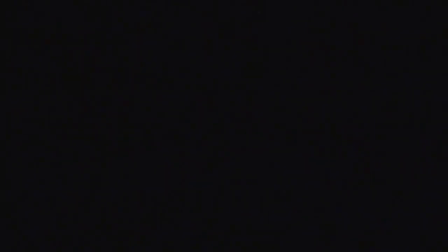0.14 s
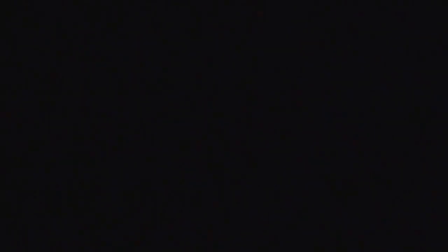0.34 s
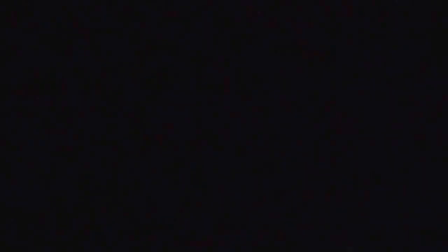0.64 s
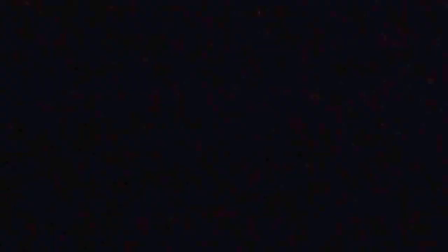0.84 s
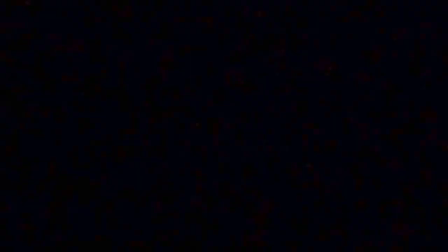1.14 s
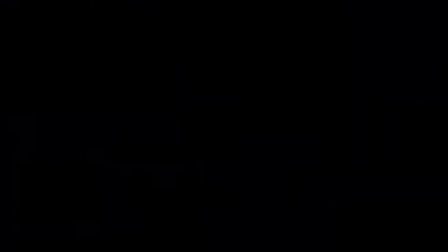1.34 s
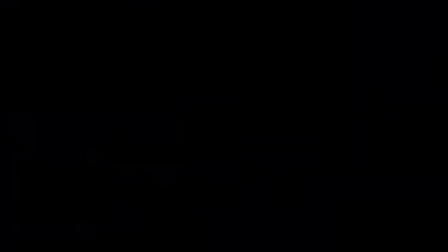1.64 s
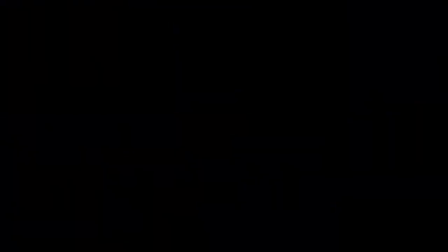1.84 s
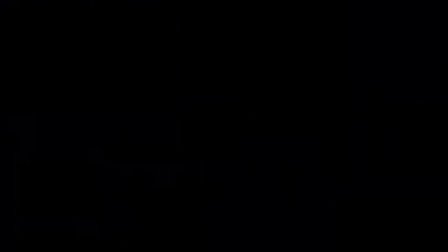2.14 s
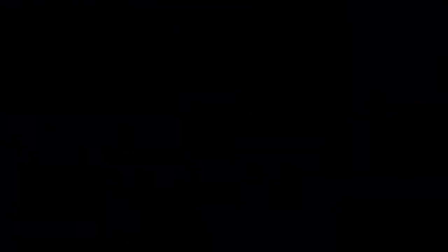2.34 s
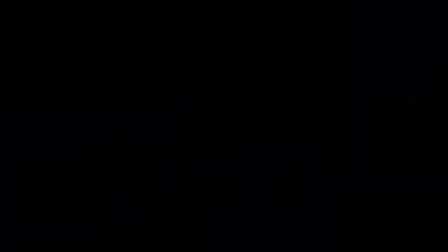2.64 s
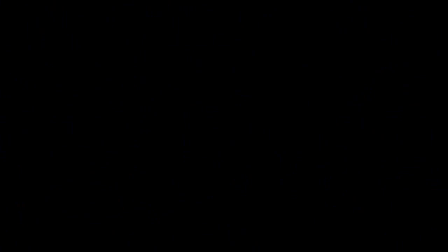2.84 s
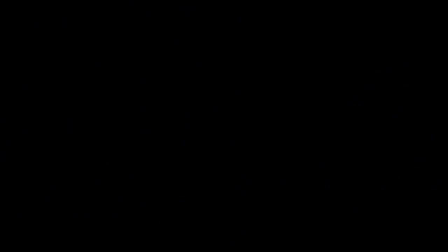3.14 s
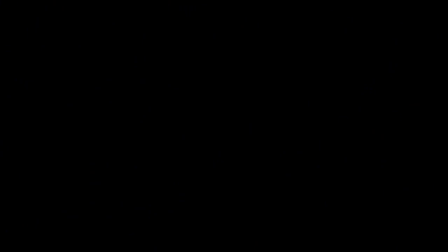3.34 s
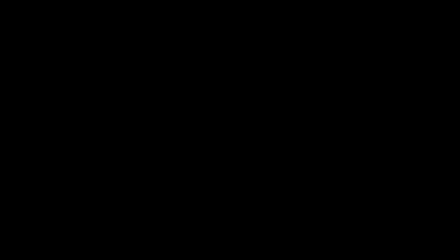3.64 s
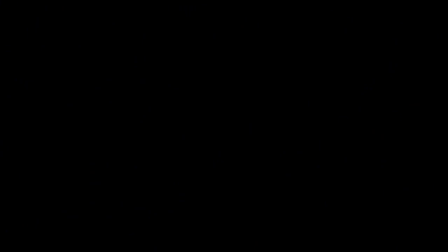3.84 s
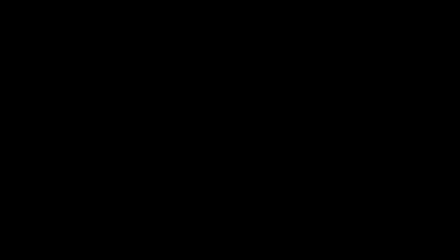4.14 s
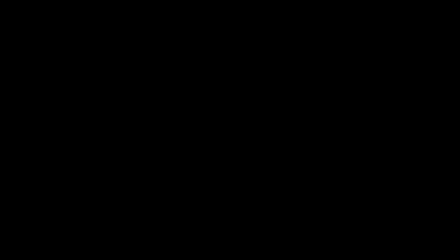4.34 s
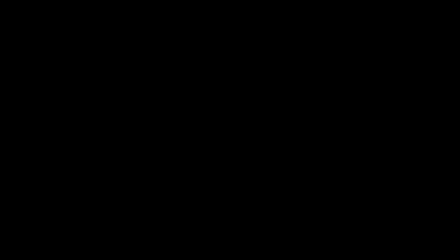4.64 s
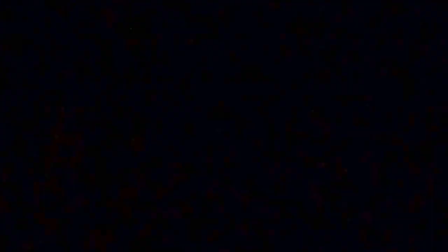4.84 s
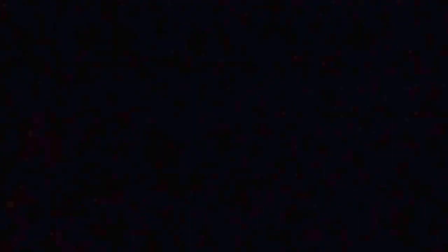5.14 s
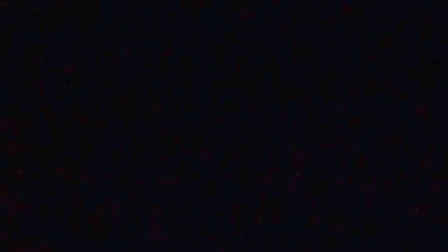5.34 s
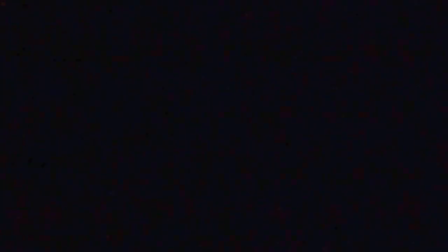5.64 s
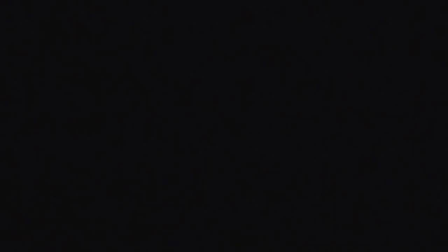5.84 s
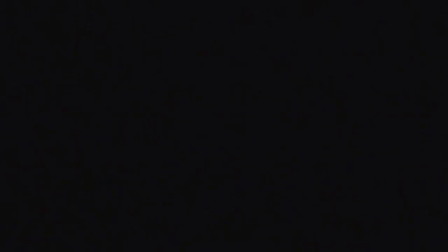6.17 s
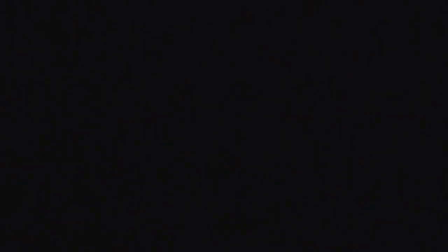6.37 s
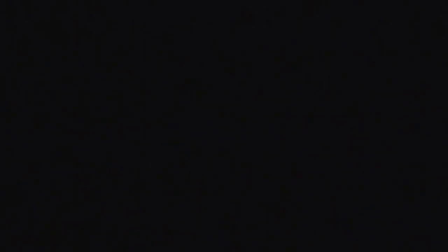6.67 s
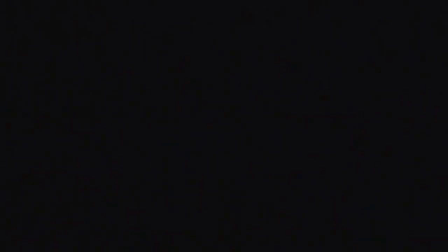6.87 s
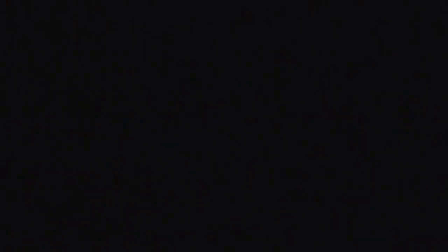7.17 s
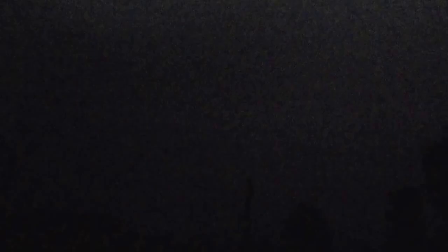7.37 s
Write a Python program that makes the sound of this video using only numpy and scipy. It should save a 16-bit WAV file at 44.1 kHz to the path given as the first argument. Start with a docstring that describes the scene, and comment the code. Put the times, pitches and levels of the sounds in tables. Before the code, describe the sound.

A close microphone in the rain picks up hiss, splashing drops and a faint low hum. Muffled thunder thumps swell first, then a long peal tears open in uneven bursts, low-mid and rough, flattened by overload at its strongest. Brief lulls let the rain through. Later, crisp ticks and splashes crowd in between renewed thunder surges, with dry echoes from near and far surfaces.

```python
"""Close drops tick and splash over the hiss of heavy rain and a broad roar, while thuds and a lumpy rumble roll.
Then thunder breaks into a string of short claps with bright cracks, thrown back by a near and a far surface.
Thunder and rain are shaped noise, drops are short rings with a burst of spray, thuds are brief swings of air.
A low hum drones on beside a second, sinking drone; the loudest moments overload the input of the microphone."""
import sys
import numpy as np
from scipy import signal
from scipy.io import wavfile
from scipy.ndimage import uniform_filter1d

SR = 44100
rng = np.random.default_rng(int(sys.argv[2]) if len(sys.argv) > 2 else 0)


def to_wav(sig):
    """Store sig (one row per channel, or 1-D mono) as 16-bit WAV at the path in sys.argv[1].

    Samples outside -1..1 are clipped; the rate is SR.
    """
    pcm = np.clip(np.atleast_2d(sig), -1, 1) * 32767
    pcm = np.round(pcm).astype(np.int16)
    wavfile.write(sys.argv[1], SR, pcm.T)  # frames by channels


N = 331191
T = np.arange(N) / SR

# Claps: start_s [s], peak_db [dB, body before echoes], pitch_hz [Hz, centre of the noise]
CLAPS = [(1.191, -25, 268), (1.274, -24, 337), (1.311, -24, 260), (1.348, -14.5, 606), (1.384, -23, 570),
         (1.411, -23.5, 265), (1.524, -29, 288), (1.539, -17.5, 570), (1.571, -18, 563), (1.632, -35, 417),
         (1.671, -30, 420), (1.78, -20.5, 504), (1.805, -14.5, 413), (1.869, -28, 444), (1.899, -22, 503),
         (2.036, -18.5, 614), (2.072, -19.5, 367), (2.105, -18, 453), (2.134, -11, 466), (2.177, -18, 298),
         (2.207, -19.5, 410), (2.254, -18, 487), (2.283, -17.5, 313), (2.327, -27.5, 320),
         (2.344, -26, 332), (2.554, -29.5, 290), (2.629, -21, 260), (2.644, -24.5, 388),
         (2.672, -16.5, 396), (2.708, -22.5, 289.5), (2.744, -15.5, 288), (2.847, -31, 262),
         (2.901, -46, 264), (3.014, -28, 302), (3.066, -25, 268), (3.083, -18, 617), (3.102, -16, 498),
         (3.344, -19.5, 558), (3.365, -18, 474), (3.393, -23, 305), (3.503, -13, 722), (3.562, -19, 300),
         (3.604, -18, 310), (3.622, -19, 328), (3.635, -15, 302), (3.655, -24, 406), (3.7, -18, 300),
         (4.238, -23.5, 380), (4.304, -25.5, 450), (4.548, -25, 280), (4.569, -32, 240), (4.7, -18.5, 714),
         (4.738, -16.5, 337), (4.763, -14, 426), (4.791, -20.5, 403), (4.857, -13.5, 475),
         (4.879, -15, 262), (4.911, -16, 430), (4.93, -26, 261), (4.967, -17, 540), (4.977, -19, 256),
         (5.055, -20.5, 524), (5.093, -24, 297), (5.128, -22, 285), (5.188, -17.5, 493),
         (5.336, -18.5, 597), (5.355, -22, 510), (5.408, -21, 233), (5.433, -16.5, 387), (5.449, -19, 224),
         (5.563, -22, 430), (5.606, -28, 402), (5.714, -12.5, 300), (5.739, -24, 202), (5.775, -39, 200),
         (5.881, -23.5, 330), (5.903, -26.5, 344), (5.979, -14.5, 378), (6, -15, 378), (6.032, -24.5, 390),
         (6.124, -23.5, 420), (6.141, -26.5, 386), (6.424, -22.5, 242), (6.65, -20, 605),
         (6.824, -21.5, 404), (6.849, -19.5, 263), (6.866, -12.5, 394), (6.906, -15.5, 438),
         (6.922, -16, 457), (6.948, -22.5, 436), (6.982, -12, 373), (7.02, -22, 400), (7.041, -21.5, 417),
         (7.07, -25, 278), (7.09, -21.5, 345), (7.113, -24, 350), (7.164, -18, 364), (7.217, -17, 350),
         (7.239, -21, 405), (7.253, -21, 400), (7.272, -18, 318), (7.452, -21.5, 310), (7.491, -20, 805)]
# Bright crack on top of the claps: time_s [s], level_db [dB over the clap]
CRACK_LEVEL = [(1.2, -17), (1.45, -15), (1.7, -16), (1.85, -12), (2.14, -18.5), (2.3, -21.5), (2.7, -21),
               (3.1, -23.5), (3.5, -23), (4.3, -21), (4.72, -23.5), (5.1, -26), (5.45, -24.5),
               (5.72, -21.5), (6.0, -26.5), (6.5, -23), (6.9, -26), (7.3, -25)]
# Echo paths as the thunder rolls off: time_s [s], near_lag_s [s], near_gain [0-1], far_gain [0-1], dullness [0-1]
ECHO_PATHS = [(1.2, 0.0033, 0, 0.37, 0), (1.9, 0.0024, 0.26, 0.86, 0), (2.4, 0.0028, 0.29, 0.58, 0.4),
              (2.8, .0039, .65, 0.76, 0.06), (4.2, 0.0039, 0.5, 0.76, 0.18), (5.1, 0.0045, 0.67, 0.7, 0.03),
              (5.9, 0.005, 0.59, 0.64, 0.52), (6.4, 0.0051, 0.57, 0.5, 0.33),
              (7.0, 0.0052, 0.18, 0.08, 0.25), (7.51, 0.0048, 0.06, .03, 0.06)]
# Storm swelling and fading: time_s [s], rumble_db [dB], crackling_roll_db [dB], roar_db [dB]
STORM_LEVEL = [(0, -35.5, -48, -41), (.25, -36, -43.5, -49.5), (.4, -30.5, -38.5, -43.5),
               (.52, -32, -40, -46.5), (.7, -34, -44, -52.5), (.9, -33.5, -57, -50.5),
               (1.35, -32.5, -47, -36), (1.63, -30.5, -43, -38), (1.79, -44, -36, -33),
               (1.855, -44, -36, -37.5), (1.92, -34.5, -30.5, -35), (2.1, -38, -41, -32.5),
               (2.21, -35, -23.5, -38), (2.29, -44, -23, -43.5), (2.34, -27, -38, -49),
               (2.42, -43, -44.5, -51.5), (2.6, -39.5, -47.5, -48), (2.72, -35.5, -29.5, -39.5),
               (2.82, -47, -42, -49), (3.0, -49, -39.5, -46), (3.25, -43, -38.5, -41),
               (3.55, -36, -32, -34.5), (3.73, -45, -44.5, -44.5), (4.22, -45, -35, -38.5),
               (4.68, -40, -36.5, -38.5), (4.78, -48, -32.5, -40.5), (4.84, -35, -43, -42.5),
               (4.9, -50, -35, -47), (4.97, -44, -46, -46), (5.03, -42, -45, -45), (5.17, -40, -32.5, -45),
               (5.3, -41, -38, -38.5), (5.45, -42, -37.5, -44), (5.53, -41, -34.5, -40),
               (6.08, -42, -48.5, -48), (6.5, -45, -33, -42.5), (6.8, -34.5, -39, -43.5),
               (7.0, -37.5, -33, -47.5), (7.3, -38, -37, -49), (7.51, -46, -32, -46.5)]
# Deep thuds: start_s [s], level_db [dB], pitch_hz [Hz]
THUDS = [(0.355, -18, 99), (0.447, -25, 86), (0.579, -17, 60), (0.585, -11, 118), (0.653, -23.5, 110),
         (0.752, -22, 140), (0.79, -17, 120), (0.949, -18.5, 101), (0.998, -18.5, 56), (1.037, -22, 90),
         (1.195, -27, 148), (1.242, -20, 89), (1.273, -16, 134), (1.427, -22, 55), (1.523, -18.5, 54),
         (1.646, -26, 45), (1.719, -17.5, 45), (2.133, -25, 81.5), (2.157, -20, 67), (2.19, -18, 145),
         (2.209, -10, 146), (2.235, -16, 99), (2.264, -13, 120), (2.286, -32, 55), (2.708, -15, 81),
         (2.729, -17, 98), (2.75, -36, 45.6), (5.472, -16, 155), (6.004, -14.5, 145), (6.866, -17.5, 100),
         (6.977, -17, 103), (7.012, -20, 102), (7.215, -16, 98)]
# Tone colour of the rumble: pitch_hz [Hz], density_db [relative dB per Hz]
RUMBLE_COLOUR = [(7.1, -35.5), (12, -16), (29, 3), (125, -1.5), (229, -10), (285, -13.5), (360, -17.5),
                 (402, -11.5), (500, -36.5), (650, -55), (1100, -120)]
# Tone colour of the broad roar that swells with the thunder: pitch_hz [Hz], density_db [relative dB per Hz]
ROAR_COLOUR = [(180, -20.5), (300, 0.5), (344, 1), (374, 5.5), (852, 7), (1060, 5.5), (1150, 4),
               (1580, -1.5), (2890, -16), (8000, -47.5), (10400, -101), (17600, -120)]
# Bright upper band of the roar: time_s [s], level_db [dB]
SIZZLE_LEVEL = [(0, -65), (.6, -58), (1.15, -55), (1.35, -50.5), (1.8, -52.5), (2.15, -79), (2.35, -71),
                (2.6, -88), (3.0, -67.5), (3.4, -54.5), (3.8, -76), (5.9, -72), (6.5, -68), (7.0, -79),
                (7.51, -78)]
# Near drops: start_s [s], level_db [dB], ring_hz [Hz], splash_db [dB over the level]
DROPS = [(0.066, -29.5, 3030, -14), (0.105, -29, 3200, -7.5), (0.322, -42, 3000, -1),
         (0.529, -39, 3180, -3.5), (0.6648, -32, 3000, -25), (1.257, -46, 5500, -16),
         (1.313, -44, 6500, -16), (1.425, -40, 3180, 1), (1.641, -44, 7500, -14), (1.853, -46, 8000, -16),
         (2.011, -44, 5500, -13), (2.037, -40.5, 6040, -5), (2.137, -44, 3260, -13),
         (2.264, -37, 3260, -18), (2.2805, -34.5, 3080, -12), (2.333, -60, 7000, -16),
         (2.564, -54, 3010, -9), (2.616, -47.5, 2900, -10), (2.68, -54, 6000, -13),
         (2.7564, -41, 3010, -17), (2.772, -52, 6500, -16), (2.873, -56, 6500, -14),
         (2.8968, -53, 6500, -8), (3.027, -50, 3000, -2), (3.164, -46, 3210, -2),
         (3.1826, -34.5, 3290, -7.5), (3.227, -39, 3240, -7), (3.5012, -33, 3000, -6.5),
         (3.58, -36, 3030, -1.5), (3.6198, -35, 3040, -7), (3.647, -35.5, 3040, -9),
         (3.712, -34.5, 3200, -7), (3.742, -37, 3350, -9), (3.8186, -43.5, 3020, -2),
         (3.863, -44, 3000, -3), (3.949, -37.5, 3260, -10), (4.0824, -50, 3280, -6),
         (4.1579, -44, 3030, -6), (4.262, -35.5, 3370, -7), (4.337, -41, 3230, -5),
         (4.4293, -46, 3040, -12), (4.4714, -39.5, 3260, -6), (4.561, -37, 3020, -8),
         (4.603, -33, 3040, -10.5), (4.7183, -31.5, 3040, -2), (4.8653, -29.5, 3200, -9),
         (4.907, -42, 3200, -8), (4.946, -38, 3180, -10), (4.993, -38, 3050, -6), (5.031, -42, 3300, -5.5),
         (5.1315, -30, 3450, -6), (5.2014, -31, 3220, -8.5), (5.227, -35.5, 3050, -4),
         (5.266, -27, 3300, -7.5), (5.2934, -35, 4500, -14), (5.32, -39, 3040, -7), (5.367, -45, 7000, -10),
         (5.3936, -25, 4300, -14), (5.5148, -30, 3040, -14), (5.538, -33, 3030, -11),
         (5.563, -33, 3170, -10), (5.5886, -37, 3050, -3), (5.6164, -40, 4200, -9), (5.683, -35, 3200, -6),
         (5.7022, -30, 2850, -2), (5.7395, -35, 3380, -7), (5.8345, -50, 2980, -8),
         (5.8825, -46, 3000, -2.5), (5.928, -44, 3280, -2), (5.9579, -46, 4550, -12),
         (5.9755, -40, 3130, -17), (6.1104, -45, 5000, -6), (6.127, -48, 2980, -10),
         (6.156, -37.5, 3300, -27), (6.22, -39.5, 3060, -9), (6.2432, -43, 3000, -5),
         (6.305, -43, 3130, -1.5), (6.354, -36, 3360, -5), (6.3934, -25.5, 5530, -12.5),
         (6.4363, -38, 3490, -4), (6.485, -43, 3100, -11), (6.58, -38, 3300, -8), (6.6235, -31, 3550, -7),
         (6.651, -32.5, 3380, -6), (6.692, -36, 3240, -8), (6.7111, -25.5, 5770, -16),
         (6.755, -36.5, 3030, -8), (6.867, -36, 2900, -8), (6.894, -33.5, 6300, -31),
         (6.9187, -35, 3230, -19), (6.951, -42, 3000, -7), (7.0246, -38, 3080, -14),
         (7.1696, -50, 2900, -8), (7.242, -32.5, 3040, -16), (7.3575, -38.5, 3320, -7),
         (7.443, -41, 4170, -5)]
# Treble hiss of the far rain: time_s [s], level_db [dB], small_drops_db [dB over the hiss]
HISS_LEVEL = [(0, -57.5, -9), (.27, -58.5, -10), (.6, -54, -18), (1.5, -64.5, -2.5), (3.0, -58.5, -5.5),
              (3.3, -53.5, -8), (4.0, -55.5, -10), (4.6, -51.5, -10), (5.6, -54.5, -6), (6.7, -49, -9.5),
              (7.51, -53, -16)]
# Tone colour of the hiss: pitch_hz [Hz], density_db [relative dB per Hz]
HISS_COLOUR = [(880, -2), (1500, -6.5), (2180, -49), (2900, -15), (3850, -15), (9790, -25), (11000, -28.5),
               (14300, -77.5), (22000, -120)]
# Rain drumming on one surface, a narrow band: time_s [s], level_db [dB]
DRUMMING_LEVEL = [(0, -53.5), (.6, -51), (1.1, -47), (1.5, -41), (2.1, -42.5), (2.35, -59), (3.3, -61.5),
                  (4.3, -50.5), (5.5, -81), (7.51, -94)]
# Second drone, sinking and fading: time_s [s], pitch_hz [Hz], level_db [dB]
DRONE = [(1.4, 61.6, -67), (1.8, 58, -33), (2.3, 59.7, -45), (2.6, 55.9, -69), (3.0, 52.75, -37.5),
         (3.7, 51.9, -45), (4.4, 54.3, -64), (4.8, 53.6, -62)]
# Moments when hiss and hum sink and climb back: deepest_s [s], depth_db [dB, for the hiss]
DIPS = [(1.85, 6.5), (2.17, 4.5), (2.361, 25.5), (3.66, 7.5), (4.97, 11), (6.1, 5), (7.07, 0.5)]

# A clap rises, swings and trails off, counted in swings of its length-scaled pitch
RISE_TURNS, CLAP_TURNS, TAIL_GAIN, TAIL_TURNS = 0.92, 4.68, 0.088, 8.7
USUAL_HZ, LENGTH_LAW = 349, 0.51  # deeper claps last longer, by this power of the pitch
FIRMNESS = 0.34  # 0 = a clap wavers like noise, 1 = it keeps closely to its outline
ONSET_S, CRACK_FADE_S = 0.89, 0.99  # from the onset on, the crack over the claps dulls at this pace
FAR_ECHO_S, ROLL_ECHO_GAIN = 0.02, 0.56  # the scattered roll comes back weaker than a clap
OPEN_HZ, DULL_HZ = 812, 626  # treble edge of the body on a short and on a long path

TICK_DB, TICK_DB_PER_OCTAVE = 2.5, -2  # tick over the drop's level at 3200 Hz; higher drops tick softer
TICK_RING_S, SPLASH_RISE_S = 0.0026, 0.0004  # the ring falls 60 dB in this time
SPRAY_UNDER_TAP_DB = 1
SMALL_DROPS_PER_S, SIZE_SPREAD_DB = 500, 6.5

HUM_HZ, HUM_DB = 25.1, -36
SINK_DB_PER_S, CLIMB_DB_PER_S = 91, 25.5
HUM_SHARE = 0.58  # part of the dip that reaches the hum
SELF_NOISE_DB = -82.5
CEILING, EDGE_HZ = 0.204, 10650  # input overload (full scale = 1) and treble limit


def claps():
    """Bursts of shock waves make the body, echoed nearby; a brighter noise band cracks on top."""
    bodies, cracks = np.zeros((2, N))
    size = 2400
    for (start_s, peak_db, pitch_hz), draw in zip(CLAPS, rng.standard_normal((len(CLAPS), 3000))):
        shape = clap_shape(size, pitch_hz)
        # the last samples, once the resonances have settled
        body = shape * firm(shocks(draw, pitch_hz, spread=1.3, boom=0.44))[-size:]
        add(bodies, start_s, gain_of(peak_db) * body / abs(body).max())

        brightness = np.exp(-max(start_s - ONSET_S, 0) / CRACK_FADE_S)
        crack_db = peak_db + np.interp(start_s, *np.transpose(CRACK_LEVEL))
        crack = band(draw, 1150 + 450 * brightness, width_hz=760 + 1300 * brightness)
        add(cracks, start_s, gain_of(crack_db) * shape * firm(crack)[-size:])
    return near_echo(bodies) + low_pass(cracks, 2800)


def clap_shape(size, pitch_hz):
    """A smooth rise, a firm swell and a weak tail, all stretched for deeper claps."""
    turns = np.arange(size) * USUAL_HZ * (pitch_hz / USUAL_HZ) ** LENGTH_LAW / SR
    rise = 1 - np.exp(-(turns / RISE_TURNS) ** 2)
    swell = np.exp(-(turns / CLAP_TURNS) ** 4)
    tail = TAIL_GAIN * np.exp(-turns / TAIL_TURNS)
    return rise * (swell + tail)


def shocks(draw, hz, spread, boom):
    """Overlapping shock waves: a broad hump of noise over a low boom."""
    return evened(band(draw, hz, width_hz=spread * hz) + boom * band(draw, 205, width_hz=356))


def firm(x):
    """Evens out the wavering strength of a noise by dividing out part of its envelope."""
    return evened(x / (abs(signal.hilbert(x)) + 0.17) ** FIRMNESS)


def crackling_roll():
    """Scattered thunder: running shock noise whose strength lurches, echoed nearby."""
    lumps = gain_of(2.9 * wander(0.0064))
    roll = shocks(rng.standard_normal(N), 443, spread=2.25, boom=0.46) * lumps
    return near_echo(gain_of(curve(STORM_LEVEL, column=2)) * evened(roll))


def near_echo(x):
    """A long path dulls the body; its echo off the near surface slides in time as the path changes."""
    bright, dull = low_pass(x, OPEN_HZ), low_pass(x, DULL_HZ)
    dullness = np.clip(curve(ECHO_PATHS, column=4), 0, 1)
    body = bright + dullness * (dull - bright)
    return body + curve(ECHO_PATHS, column=2) * np.interp(T - curve(ECHO_PATHS), T, body)


def rolling_claps():
    """Claps over the roll, both thrown back once more by the far surface."""
    sharp, diffuse = claps(), crackling_roll()
    far_echo = np.interp(T - FAR_ECHO_S, T, sharp + ROLL_ECHO_GAIN * diffuse)
    return sharp + diffuse + curve(ECHO_PATHS, column=3) * far_echo


def thuds():
    """Each deep thud is one strong push and pull of the air with a short swing after it."""
    out = np.zeros(N)
    for start_s, level_db, pitch_hz in THUDS:
        turns = np.arange(round(2.5 * SR / pitch_hz)) * pitch_hz / SR
        swell = turns * np.exp(1 - turns / 0.38) / 0.54
        add(out, start_s, gain_of(level_db) * np.sin(2 * np.pi * turns) * swell)
    return out


def rumble():
    """A lumpy low roll: deep noise that flickers in level."""
    return gain_of(curve(STORM_LEVEL)) * noise(RUMBLE_COLOUR, size=2048, patchy_db=1.44, flicker_db=3.0)


def broad_roar():
    """Broad noise that swells with the thunder, with a bright sizzling band on top."""
    roar = noise(ROAR_COLOUR, size=512, patchy_db=2.0, flicker_db=2.0)
    sizzle = band(rng.standard_normal(N), 2410, width_hz=2150)
    return gain_of(curve(STORM_LEVEL, column=3)) * roar + gain_of(curve(SIZZLE_LEVEL)) * sizzle


def near_drops():
    """Each large drop lands close to the microphone with a tick and a splash."""
    out = np.zeros(N)
    for (start_s, level_db, ring_hz, splash_db), draw in zip(DROPS, rng.standard_normal((len(DROPS), 4000))):
        drop = splash(draw, ring_hz, 0.071, splash_db - SPRAY_UNDER_TAP_DB, splash_db)
        add(out, start_s, gain_of(level_db) * drop)
    return out


def splash(draw, ring_hz, t60_s, spray_db, tap_db):
    """A sharp tick with a very short ring, then spray; the surface gives a duller tap."""
    t = np.arange(len(draw)) / SR
    ring = np.sin(2 * np.pi * ring_hz * t) + 0.25 * np.sin(2 * np.pi * 1.56 * ring_hz * t)
    tick_db = TICK_DB + TICK_DB_PER_OCTAVE * np.log2(ring_hz / 3200)
    tick = gain_of(tick_db - 60 * t / TICK_RING_S) * ring
    fade = gain_of(-60 * t / max(t60_s, 0.004)) * np.minimum(t / SPLASH_RISE_S, 1)
    spray = evened(resonate(draw, ring_hz, width_hz=2600) - resonate(draw, 570, width_hz=3450))
    tap = band(draw, 2220, width_hz=2100)
    return tick + fade * (gain_of(spray_db) * spray + gain_of(tap_db) * tap)


def far_rain():
    """Distant drops blur into hiss with patter in it, beside a narrow band of drumming noise."""
    hiss = noise(HISS_COLOUR, size=256, patchy_db=1.5, flicker_db=2.0)
    hiss = hiss + gain_of(curve(HISS_LEVEL, column=2)) * small_drops()
    drumming = band(rng.standard_normal(N), 1584, width_hz=560)
    return gain_of(curve(HISS_LEVEL) - dips()) * hiss + gain_of(curve(DRUMMING_LEVEL)) * drumming


def small_drops():
    """Patter: eight pitches of splash, each struck at random times and strengths."""
    patter = np.zeros(N)
    for ring_hz, draw in zip(np.geomspace(2500, 8000, num=8), rng.standard_normal((8, 2000))):
        strength = gain_of(SIZE_SPREAD_DB * np.minimum(rng.exponential(1, N), 4))
        strikes = strength * (rng.random(N) < SMALL_DROPS_PER_S / 8 / SR)
        drop = splash(draw, ring_hz, 0.025, spray_db=-8, tap_db=-7)
        patter += signal.oaconvolve(strikes, drop)[:N]
    return evened(patter)


def drones():
    """Two low sine tones that waver in pitch; the steady hum also wavers in level."""
    hum = np.sin(2 * np.pi * np.cumsum(HUM_HZ + 0.24 * wander(0.3)) / SR) * gain_of(3.3 * wander(0.17))
    sinking = np.sin(2 * np.pi * np.cumsum(curve(DRONE) + 0.5 * wander(0.039)) / SR)
    hum_gain = gain_of(HUM_DB - HUM_SHARE * dips())
    return np.sqrt(2) * (hum_gain * hum + gain_of(curve(DRONE, column=2)) * sinking)


def dips():
    """Depth in dB of the level dips: a quick fall to each listed moment, then a slower climb."""
    depths = []
    for deepest_s, depth_db in DIPS:
        away_db = np.where(T < deepest_s, SINK_DB_PER_S * (deepest_s - T), CLIMB_DB_PER_S * (T - deepest_s))
        depths.append(np.maximum(depth_db - away_db, 0))
    return np.max(depths, axis=0)


def noise(colour, size, patchy_db, flicker_db):
    """Random short-time spectra with drifting patches and a flicker shared by all pitches."""
    frames, hz = 4 * N // size + 5, np.fft.rfftfreq(size, 1 / SR)
    real, imaginary, patches = rng.standard_normal((frames, len(hz), 3)).T
    patches = evened(uniform_filter1d(uniform_filter1d(patches, 6, 0), 8, 1))  # over pitch, then time
    flicker = evened(uniform_filter1d(rng.standard_normal(frames), 3))
    pitch_hz, density_db = np.transpose(colour)
    colour_db = np.interp(np.log(hz + 1), np.log(pitch_hz + 1), density_db)[:, None]
    level = gain_of(colour_db + patchy_db * patches + flicker_db * flicker)
    spectra = (real + 1j * imaginary) * level
    return evened(signal.istft(spectra, nperseg=size, noverlap=3 * size // 4)[1][:N])


def resonate(x, hz, width_hz):
    """Shifts hz down to zero, smooths, and shifts back: a resonance of gain 1."""
    turn = np.exp(2j * np.pi * np.cumsum(hz * np.ones(len(x))) / SR)
    r = np.exp(-np.pi * width_hz / SR)
    return 2 * (turn * signal.lfilter([1 - r], [1, -r], x / turn + 1e-18)).real


def band(x, hz, width_hz):
    """A resonance applied twice for steep flanks, scaled to rms 1."""
    return evened(resonate(resonate(x, hz, width_hz), hz, width_hz))


def low_pass(x, edge_hz):
    """Takes away the treble above an edge, steeply."""
    return signal.sosfilt(signal.butter(6, edge_hz, fs=SR, output="sos"), x)


def wander(seconds):
    """Smoothed random drift of rms 1; longer seconds drift more slowly."""
    size = max(round(seconds * SR), 2)
    return evened(uniform_filter1d(uniform_filter1d(rng.standard_normal(N), size), size))


def curve(rows, column=1):
    """One column of a table, drawn as straight lines sample by sample."""
    rows = np.array(rows)
    return np.interp(T, rows[:, 0], rows[:, column])


def add(mix, start_s, sound):
    """Mixes a sound in at its start time."""
    part = mix[round(start_s * SR):][:len(sound)]
    part += sound[:len(part)]


def gain_of(db):
    """Decibels to amplitude."""
    return 10 ** (np.asarray(db) / 20)


def evened(x):
    """Scales to rms 1."""
    return x / np.sqrt(np.mean(x ** 2) + 1e-20)


def scene():
    """All sources add up at one microphone, with its faint own noise."""
    thunder = rolling_claps() + thuds() + rumble()
    rain = near_drops() + far_rain()
    self_noise = gain_of(SELF_NOISE_DB) * rng.standard_normal(N)
    return (thunder + broad_roar() + rain + drones() + self_noise)[None]


def record(dry):
    """The input clips hard at its ceiling; then a low-pass limits the treble."""
    clipped = np.clip(dry, -CEILING, CEILING)
    treble_limit = signal.firwin(75, EDGE_HZ, window=("kaiser", 8), fs=SR)
    return signal.oaconvolve(clipped, treble_limit[None], "same")


dry = scene()
out = record(dry)
to_wav(out)
```